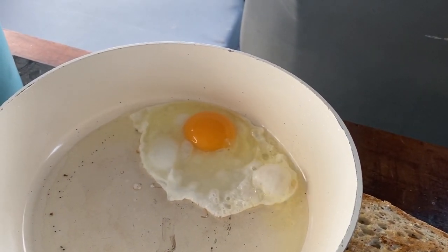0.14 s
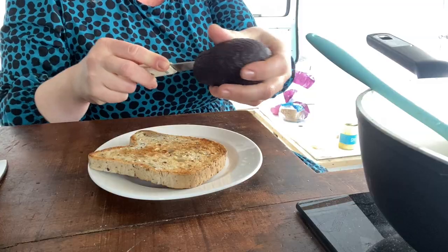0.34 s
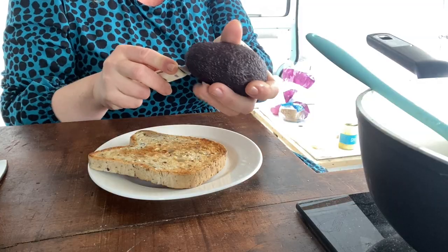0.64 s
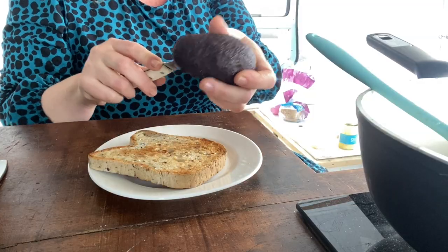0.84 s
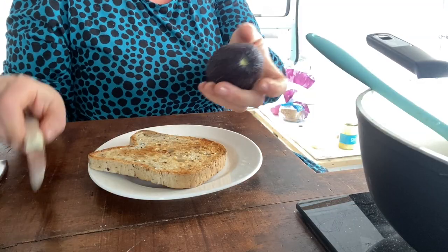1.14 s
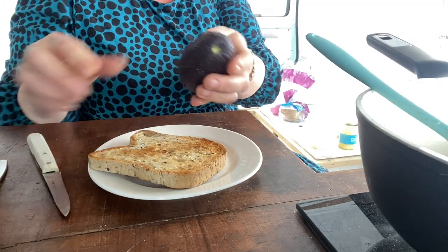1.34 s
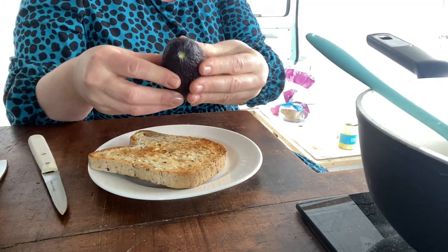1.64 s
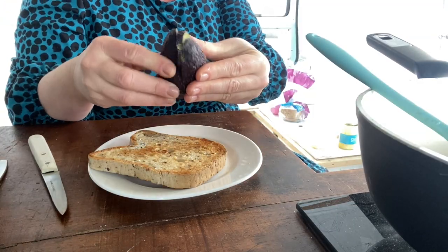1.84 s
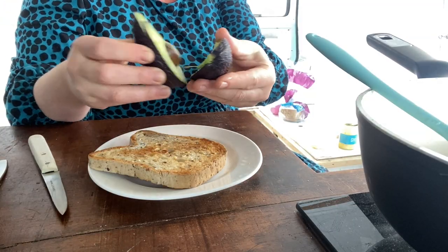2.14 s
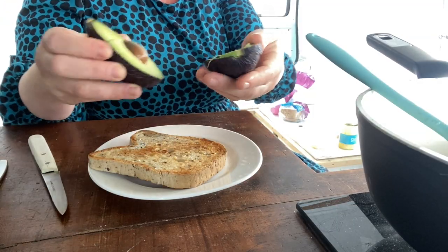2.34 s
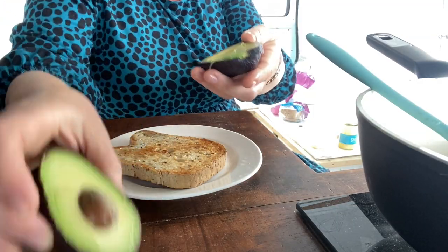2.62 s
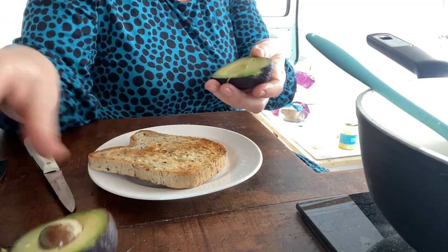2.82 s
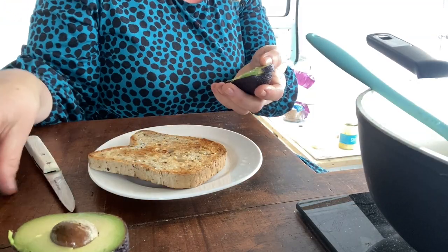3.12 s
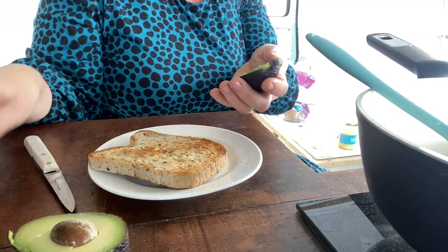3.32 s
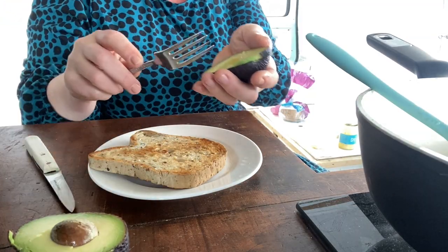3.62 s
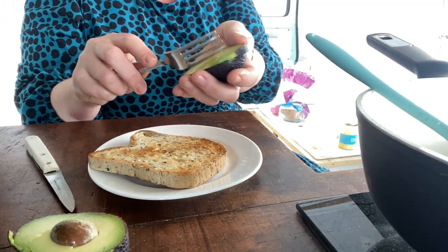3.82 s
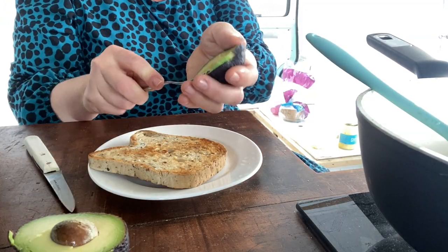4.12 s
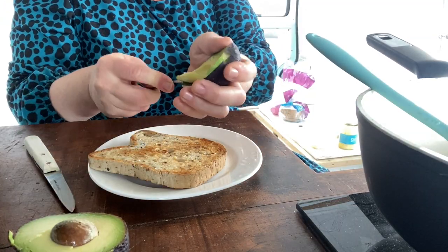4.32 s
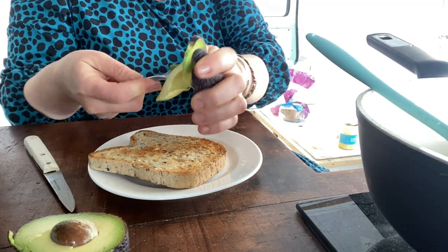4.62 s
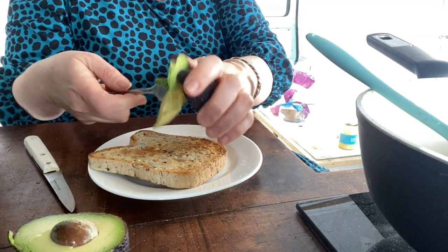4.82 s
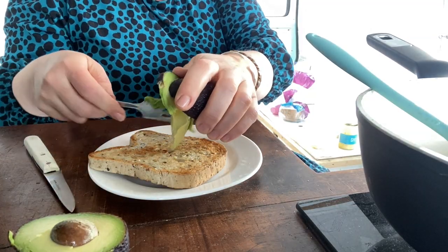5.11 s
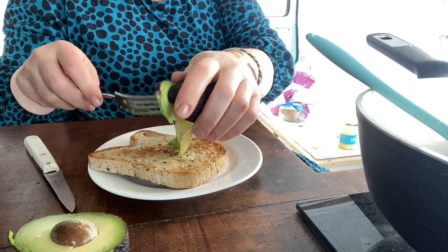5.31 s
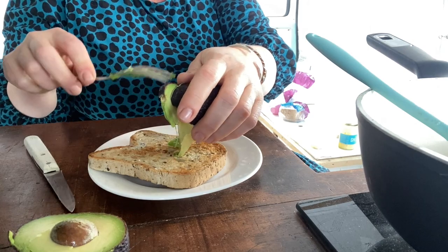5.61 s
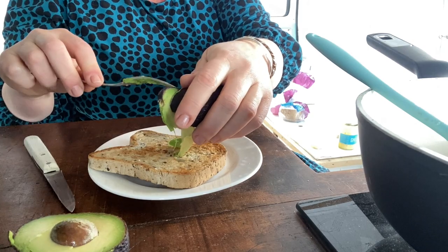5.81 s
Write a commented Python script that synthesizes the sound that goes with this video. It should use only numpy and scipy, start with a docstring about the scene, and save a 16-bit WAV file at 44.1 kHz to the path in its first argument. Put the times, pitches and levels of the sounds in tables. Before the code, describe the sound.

A split second of dry, bright egg-frying crackle right at the microphone cuts abruptly to a table in a small, dry van cabin. Fat keeps spitting irregularly from a pan across the space. A knife snaps out of an avocado, clicks, and rocks to rest on wood. Later come a soft fruit thud, small fork clicks and faint moist scooping, over a low murmur.

```python
"""An egg crackles in hot fat right under the microphone; then the pan spits from across a small van kitchen.
At the table a knife snaps free of an avocado and is laid down, rocking on the wood.
One half of the fruit is set down with a thud, and a fork is picked up and scoops out the other.
Fat, steam and cutlery are coloured bursts and grains of noise; blade and table top are damped modes.
Thuds and knocks add bending waves in the board, and the cabin murmurs in the background."""
import sys
import numpy as np
from scipy import signal
from scipy.fft import rfft, irfft
from scipy.io import wavfile
from scipy.ndimage import uniform_filter1d

SR = 44100
rng = np.random.default_rng(int(sys.argv[2]) if len(sys.argv) > 2 else 0)


def wrap_up_sound(samples):
    """Save the sound to the file named by the first command line argument, as 16-bit audio."""
    columns = np.atleast_2d(samples).T
    # keep every value between -1 and 1, then stretch to whole-number steps
    tamed = np.clip(columns, -1, 1)
    steps = np.round(tamed * 32767).astype(np.int16)
    wavfile.write(sys.argv[1], SR, steps)


N = 262836

MOVE_S = .277  # the microphone changes from the pan to the table
ROOM_T60_S = 0.16
TIME = np.arange(N) / SR
AGE = TIME[:16384]  # seconds since the start of one event
HZ = np.fft.rfftfreq(4096, 1 / SR) + 1  # frequency axis of the spectra; the offset avoids log(0)

# Largest bubbles bursting close to the microphone: start_s, level_db
CLOSE_POPS = [(.0212, -30), (0.0825, -36), (0.0905, -19), (0.1093, -32), (.1272, -36), (0.1768, -36),
              (.181, -40), (0.1907, -32.5), (0.199, -42), (.2212, -28.5), (0.2629, -28.5)]
# Steam blipping from under the egg: start_s, level_db, pitch_hz
STEAM_BLIPS = [(.008, -48, 1600), (.0462, -40, 1400), (.0595, -48, 2100), (.0905, -38, 750),
               (.12, -37, 1100), (.1622, -46, 1500), (.1968, -37, 1200), (.2028, -44, 1500),
               (.2205, -36, 1050), (.2265, -45, 1200), (.2626, -35, 2900)]
# Relative spectrum of the near crackle: frequency_hz, density_db (per Hz)
CLOSE_COLOUR = [(20, -50), (70, -2), (200, -13.5), (400, -5), (800, -9.5), (1400, -4), (3000, -7),
                (5500, -8.5), (8000, -15), (10300, 1), (11500, -6), (12800, -23), (16000, -16)]
# Relative spectrum of a near bubble: frequency_hz, density_db (per Hz)
CLOSE_POP_COLOUR = [(30, -43), (200, -22), (1000, -12.5), (3000, -33), (5500, -6.5), (8000, -4),
                    (10300, 4.5), (11500, -8.5), (12800, -32), (16000, -28)]


def close_pan():
    """Fat right under the microphone: dry, bright crackle of noise grains with short, duller blips of steam."""
    crackles = grains(750, 5, burst(.003, -18, .04))
    tilt = 1.3 * np.log2(HZ / 6000)  # dB
    out = amp(-53.5) * colour(crackles, read(CLOSE_COLOUR) + tilt)
    out += amp(-56.5) * colour(rng.standard_normal((2, N)), read(CLOSE_COLOUR))  # steady hiss
    for start_s, level_db in CLOSE_POPS:
        snap = 1.4 * (AGE == 0)
        pop = snap + burst(snap_t60=.004, room_db=-22, room_t60=.04, crest_db=3)
        add(out, start_s, amp(level_db) * colour(pop, read(CLOSE_POP_COLOUR)))
    for start_s, level_db, pitch_hz in STEAM_BLIPS:
        add(out, start_s, amp(level_db) * blip(pitch_hz, t60=.011, half_width_octaves=.8))
    for when, size, pitch in rng.random(size=(20, 3)):  # many smaller bubbles
        bubble = blip(700 * 3 ** pitch, t60=.01, half_width_octaves=.8)
        add(out, when * MOVE_S, amp(-58 + 8 * size) * bubble)
    # So near, both ports hear much the same.
    out[1] = .7 * out[0] + .6 * out[1]
    return out * np.clip((MOVE_S - TIME) / 0.0023, 0, 1)


# Big drops of fat spitting across the room: start_s, level_db, brightness_db_per_octave
SPITS = [(0.364, -38.5, 0.5), (.453, -38.5, 7.5), (.54, -30.5, 1), (0.603, -35.5, 0.5), (.651, -38, 4),
         (0.7216, -31.5, -0.5), (0.929, -31.5, 1), (1.003, -35.5, -3), (1.055, -36, -0.5),
         (1.1343, -34.5, 0), (1.177, -36, 1), (1.2499, -27, -3.5), (1.403, -34, -2), (1.6304, -37.5, 2),
         (1.817, -35.5, 6), (1.862, -39.5, 13), (1.977, -31, -1.5), (2.0627, -15, 1), (2.1265, -31, -3.5),
         (2.146, -22, 4), (2.348, -42.5, 12), (2.4437, -36.5, 1), (2.5086, -32, 6), (2.6, -39.5, 1.5),
         (2.6049, -29, -2.5), (2.7688, -39.5, 3), (2.7801, -37.5, -1), (2.796, -24.5, 1), (2.8662, -37, 1),
         (2.918, -36, -0.5), (3.036, -29, 2), (3.06, -23.5, 0), (3.176, -40.5, 0), (3.198, -25.5, -0.5),
         (3.219, -21, 1), (3.3662, -19, 2), (3.603, -42, 0), (3.769, -35, -0.5), (3.844, -43, 1),
         (3.904, -36, 1.5), (3.973, -45, 4), (4.053, -42.5, 3), (4.094, -35.5, 14), (4.116, -38, -4.5),
         (4.176, -31, 1), (4.256, -35.5, 2.5), (4.4238, -33, 2), (4.484, -40, 4), (4.701, -38, 8),
         (4.7402, -36.5, 3), (4.851, -40.5, 9.5), (4.955, -18.5, 0), (5.1254, -36.5, 2), (5.2952, -28, 1),
         (5.3012, -25.5, -2.5), (5.472, -39.5, 2), (5.5012, -25, 0.5), (5.5378, -29, -0.5),
         (5.709, -50, -2.5), (5.8003, -37, 3)]
# Longer sputters of escaping steam: centre_s, spread_s (one side), level_db
SPUTTERS = [(3.278, 0.013, -55), (4.173, 0.028, -47.5), (4.191, 0.011, -47), (4.429, 0.021, -47.5)]
# Relative spectrum of spits and sputters: frequency_hz, density_db (per Hz)
SPIT_COLOUR = [(20, -61), (100, -35.5), (300, -21), (450, -29), (640, -39.5), (1000, -15), (1800, -15),
               (2500, -6.5), (3400, -3.5), (5500, -4.5), (8300, 0.5), (10500, -4), (13500, -9),
               (15500, -32)]
# Small drops spit at random between the big ones, level and brightness varying about these centres.
DROPS_PER_S, DROP_DB, DROP_SPREAD_DB, DROP_BRIGHT_DB_PER_OCTAVE = 6.1, -51, 7, 1.5


def far_pan():
    """The pan across the van: noise bursts and grains of spitting fat, coloured and smeared by the walls."""
    walls = cabin()
    steam = sum(amp(level_db) * np.exp(-((TIME - centre_s) / spread_s) ** 2 / 2)
                for centre_s, spread_s, level_db in SPUTTERS)
    froth = grains(740, 8.5, burst(0.002, -12, 0.07))
    out = fizz() + colour(froth * steam, read(SPIT_COLOUR) + walls)
    drops = [(start_s, DROP_DB + DROP_SPREAD_DB * size, DROP_BRIGHT_DB_PER_OCTAVE * (1 + tone))
             for start_s, size, tone in scatter(MOVE_S, N / SR, DROPS_PER_S)]
    for start_s, level_db, bright in SPITS + drops:
        # No two drops burst alike.
        pop = burst(snap_t60=0.032, room_db=-7.5, room_t60=ROOM_T60_S, crest_db=6.0) * splutter()
        own = bright * np.log2(HZ / 6000) + 2.0 * ripple(count=70) + 1.8 * ripple(count=8)
        add(out, start_s, amp(level_db) * colour(pop, read(SPIT_COLOUR) + walls + own))
    return ports(out)


def splutter(depth_db=2.0, samples=90):
    """A drop breaks into droplets: the spray builds for a moment, then flickers within milliseconds."""
    flicker = np.clip(unit(uniform_filter1d(rng.standard_normal(len(AGE)), samples)), -2, 2)
    build = 1 - .5 * fade(.02)
    return amp(depth_db * (flicker - .5) * (1 - fade(.04))) * build


# Relative spectrum of the sizzling bed: frequency_hz, density_db (per Hz)
FIZZ_COLOUR = [(100, -39), (400, -41), (650, -36), (1000, -12.5), (1900, -8.5), (2400, -4.5), (3300, -5.5),
               (4700, -6), (6500, -3.5), (8300, -1.5), (10500, -3.5), (13800, -9.5), (15500, -36)]
# How hard the far pan sizzles: time_s, level_db
HEAT = [(0.28, -57.5), (0.49, -59.5), (1.17, -53.5), (1.31, -52), (1.45, -56), (1.67, -61), (2.02, -54.5),
        (2.21, -63), (2.44, -62.5), (2.84, -66), (2.98, -58), (3.26, -61), (3.42, -60.5), (3.69, -61),
        (4.11, -60), (4.82, -63.5), (5.08, -66), (5.96, -61)]


def fizz(count=6):
    """Tiny crackles from several spots of the pan, each spot with its own colour, over a faint hiss."""
    tone = read(FIZZ_COLOUR) + cabin()
    out = amp(-9) * colour(rng.standard_normal((2, N)), tone)
    for spot in range(count):
        crackles = grains(12, 3.5, burst(.014, -9, .16))
        own = 2.5 * ripple(count=40) + 2.5 * ripple(count=4)
        out += colour(crackles, tone + own) / np.sqrt(count)
    return out * amp(np.interp(TIME, *np.transpose(HEAT)))


# The blade wrenching free: start_s, level_db, hardness_hz
SNAPS = [(.679, -37, 1700), (.683, -26.5, 1370), (.6872, -33.5, 1420), (.694, -35, 3260), (.699, -35, 5140)]
# Modes of blade and fruit: pitch_hz, level_db, t60_s
BLADE_MODES = [(84, -3.5, .07), (125, -11, .07), (371, -13, .1), (765, -15, .09), (900, -5.5, .11),
               (1176, -6, .07), (1270, -1.5, .09), (1370, 5, .025), (1455, 3.5, .055), (1528, -3, .06),
               (1612, -5, .08), (1755, -2, .06), (1979, -6.5, .08), (2277, -2, .035), (2550, -11, .14),
               (2828, 3, .06), (3090, -2, .07), (3300, -4, .06), (3690, -7, .1)]
# Relative spectrum of a crack, for snaps and knocks: frequency_hz, density_db (per Hz)
CRACK_COLOUR = [(20, -66), (100, -12), (200, -10.5), (380, 2), (640, -20), (950, -2.5), (1900, -6.5),
                (3500, 1.5), (4500, 1), (9000, 3.5), (15000, -14)]


def blade():
    """The knife slips out of the fruit in a quick run of snaps, each stirring the damped modes differently."""
    out = np.zeros((2, N))
    for start_s, level_db, hardness_hz in SNAPS:
        crack_db = read(CRACK_COLOUR) + 20 * np.log10(soften(HZ, hardness_hz))
        crack = colour(burst(.02, -6, .07), crack_db)
        tone = ring(BLADE_MODES, hardness_hz, rise_cycles=.8, room_db=-16)
        add(out, start_s, amp(level_db) * (tone + amp(-8) * crack))
    return panned(ports(out), -2.9)


# The knife rocking to rest on the table: start_s, level_db, hardness_hz, flexing_db
KNOCKS = [(1.252, -42, 1000, -47), (1.2756, -27, 2900, -30), (1.308, -28, 800, -28),
          (1.339, -30.5, 786, -36), (1.3457, -36.5, 3240, -48), (1.379, -34.5, 840, -33.5),
          (1.4287, -38, 1280, -37.5), (1.501, -39.5, 1100, -42.5), (1.508, -43, 900, -40),
          (1.529, -47, 714, -48), (1.563, -62, 900, -52), (1.618, -50, 400, -51)]
# Modes of the table top with the knife on it: pitch_hz, level_db, t60_s
TABLE_MODES = [(95.6, -19, 0.19), (160.3, -17, 0.17), (273.8, -16, 0.42), (298, -18, 0.26),
               (331, -20, 0.14), (514, -8.5, 0.06), (772, -12, .07), (831, -7.5, 0.095), (934, 3.5, 0.034),
               (1110, 3, 0.032), (1276, -8.5, 0.11), (1454, -16.5, 0.2), (1870, 7, 0.018),
               (2200, -10.5, 0.1), (2640, 0, 0.032)]
# Soft bumps that reach the table; the run from 3.26 to 3.293 s is the steady buzz of the fork sliding, and the
# rows at 5.301 and 5.501 s give low-mid body to the spits there: start_s, level_db, pitch_hz
THUDS = [(1.311, -40, 170), (2.736, -47, 397), (2.738, -37.5, 150), (2.762, -48, 230), (2.78, -48, 230),
         (2.846, -47.5, 215), (3.086, -43, 400), (3.168, -35.5, 270), (3.177, -46, 280), (3.234, -48, 300),
         (3.26, -48, 275), (3.271, -49, 275), (3.282, -49, 275), (3.293, -48, 275), (5.301, -48, 400),
         (5.501, -54, 430)]
KNOCK_HZ = 293.7  # the pitch that the board's flexing settles to under the knife
THUD_RING_DB = -0.5  # a thud also sets the table top ringing
SWAY_HZ, SWAY_DB, SWAY_T60_S, SWAY_BELOW_HZ = 92, 1.5, 0.45, 134  # deep thuds rock the whole table most


def table():
    """The knife rocks on the wood; fruit, hand and fork bump it: damped modes, noise and bending waves."""
    rattle, body = np.zeros((2, 2, N))
    for start_s, level_db, hardness_hz, flexing_db in KNOCKS:
        crack_db = read(CRACK_COLOUR) + 20 * np.log10(soften(HZ, hardness_hz))
        crack = colour(burst(.016, -19, .11), crack_db)
        tone = ring(TABLE_MODES, hardness_hz, rise_cycles=1.22, room_db=-25)
        add(rattle, start_s, amp(level_db) * (tone + amp(-1) * crack))
        add(body, start_s, amp(flexing_db) * flex(KNOCK_HZ, peak_cycles=1.66, glide_turns=0.26))
    for start_s, level_db, pitch_hz in THUDS:
        boom = colour(burst(.05, -8, .25), band(pitch_hz, .55))
        tone = ring(TABLE_MODES, 0.9 * pitch_hz, rise_cycles=1.9, room_db=-12)
        add(rattle, start_s, amp(level_db) * (amp(-10.5) * boom + amp(THUD_RING_DB) * tone))
        sway = np.sin(2 * np.pi * SWAY_HZ * AGE) * (fade(SWAY_T60_S) - fade(6 / SWAY_HZ))
        sway *= soften(pitch_hz, SWAY_BELOW_HZ) ** 2
        bend = flex(pitch_hz, peak_cycles=1.1, glide_turns=0.25)
        add(body, start_s, amp(level_db) * (bend + amp(SWAY_DB) * sway))
    out = panned(ports(rattle), 1.0) + panned(body, 4.5)
    return signal.sosfilt(signal.butter(2, 50, "highpass", fs=SR, output="sos"), out)


def flex(hz, peak_cycles, glide_turns):
    """A bending wave in the board: it swells and dies within a few cycles, its high part arriving first."""
    u = AGE * hz / peak_cycles
    turns = hz * AGE + glide_turns * (1 - np.exp(-u))
    swell = (u * np.exp(1 - u)) ** 3
    return np.sin(2 * np.pi * turns) * swell * np.ones((2, 1))


# Knife and fork clicking in skin and flesh: start_s, level_db, hardness_hz
CLICKS = [(0.7643, -30, 4430), (.863, -30.5, 3100), (0.87, -33, 3100), (0.887, -36, 3120),
          (0.919, -32.5, 2970), (0.9548, -26.5, 2480), (0.9814, -24.5, 3000), (1.005, -48, 3400),
          (1.063, -30, 3150), (1.086, -35.5, 3100), (1.114, -45, 3400), (1.128, -37.5, 3300),
          (1.198, -23, 3230), (1.2406, -29, 3400), (1.561, -43, 2470), (1.641, -32, 3480),
          (2.141, -26.5, 2920), (2.383, -43.5, 4180), (2.669, -44.5, 2920), (2.884, -40, 2610),
          (3.087, -40, 1400), (3.119, -44, 2950), (3.341, -35.5, 5030), (3.358, -34.5, 2040),
          (3.561, -42.5, 1600), (3.64, -41.5, 4000), (3.677, -39.5, 3600), (3.79, -45, 4500),
          (3.858, -38.5, 2640), (4.142, -31, 4230), (4.172, -35.5, 3020), (4.447, -36, 3440),
          (5.1627, -35.5, 2780), (5.2803, -38, 2390), (5.3006, -28, 3600), (5.419, -40, 1660),
          (5.4803, -38.5, 2030), (5.603, -47, 1590), (5.762, -40.5, 1780), (5.8478, -26, 6160),
          (5.8607, -41, 6640), (5.865, -23.5, 7800), (5.889, -41, 5240)]
# Pockets of air opening in the moist flesh: start_s, level_db, pitch_hz
SQUELCHES = [(5.162, -43.5, 1900), (5.163, -46.5, 6300), (5.2815, -47, 1500), (5.421, -48, 1430),
             (5.483, -48.5, 1090), (5.765, -47.5, 1190)]
# Cutlery scraping softly through the fruit: centre_s, half_length_s, level_db
SCRAPES = [(0.96, 0.27, -62), (3.66, 0.11, -65)]
# Relative spectrum of cutlery in fruit: frequency_hz, density_db (per Hz)
CLICK_COLOUR = [(20, -55), (100, -43), (300, -19.5), (450, -20), (640, -35), (950, -19), (1300, 0.5),
                (1700, -8), (2400, -1), (3300, 2), (4500, 4), (15000, -0.5)]
SCRAPE_HARDNESS_HZ = 3600


def cutlery():
    """Knife and fork in the fruit: dull noise clicks, moist squelches and a soft scrape of fine grains."""
    out = np.zeros((2, N))
    tone = read(CLICK_COLOUR) + cabin()
    for start_s, level_db, hardness_hz in CLICKS:
        dulling = np.maximum(60 * np.log10(soften(HZ, 1.1 * hardness_hz)), -32)  # dB
        own = dulling + 2.0 * ripple(count=12)
        click = burst(snap_t60=0.038, room_db=-16.5, room_t60=0.3, crest_db=10.0)
        add(out, start_s, amp(level_db) * colour(click, tone + own))
    for start_s, level_db, pitch_hz in SQUELCHES:
        add(out, start_s, amp(level_db) * blip(pitch_hz, t60=0.032, half_width_octaves=.45))
    pressure = sum(amp(level_db) * np.exp(-((TIME - centre_s) / half_s) ** 4)
                   for centre_s, half_s, level_db in SCRAPES)
    scrape = grains(170, 2.5, burst(.015, -9, .12)) * pressure
    out += colour(scrape, tone + 60 * np.log10(soften(HZ, SCRAPE_HARDNESS_HZ)))
    return panned(ports(out), -2.1)


# Relative spectrum of the cabin's murmur: frequency_hz, density_db (per Hz)
ROOM_COLOUR = [(12, -42), (28, -19), (48, -4), (70, -4.5), (105, 2.5), (160, -4.5), (230, -15), (330, -5.5),
               (440, -0.5), (640, -21), (950, -16), (1400, -13.5), (2500, -36), (8000, -50)]
# Relative spectrum of the rumble: frequency_hz, density_db (per Hz)
RUMBLE_COLOUR = [(20, -44), (42, 4.5), (70, 1), (105, 9), (170, -3.5), (300, -14), (600, -46), (2000, -37)]
# Swells of low rumble: centre_s, spread_s (one side), level_db
SWELLS = [(4.62, .4, -66.5), (4.2, .04, -64), (4.39, .03, -58), (4.57, .06, -63.5), (5.33, .06, -71)]


def room_tone():
    """The low murmur of the cabin, steady noise, with a lumpy noise rumble that comes in swells."""
    still, moving = rng.standard_normal((2, 2, N))
    swell = sum(amp(level_db) * np.exp(-((TIME - centre_s) / spread_s) ** 2 / 2)
                for centre_s, spread_s, level_db in SWELLS)
    drift = uniform_filter1d(uniform_filter1d(rng.standard_normal(N), 1800), 900)
    lumps_db = 2.2 * unit(drift)
    murmur = amp(-67.5) * colour(still, read(ROOM_COLOUR))
    return ports(murmur + swell * amp(lumps_db) * colour(moving, read(RUMBLE_COLOUR)))


# Resonances of the van's cabin: centre_hz, width_hz, height_db
CABIN_MODES = [(469, 315, 21.5), (896, 120, 10), (1492, 37, 6), (1999, 144, 8.5), (2962, 333, 8.5)]


def cabin(count=5):
    """The resonances of the cabin in dB, with chance ripples for its reflections."""
    peaks = sum(db / (1 + (2 * (HZ - hz) / width) ** 2) for hz, width, db in CABIN_MODES)
    return peaks + 1.6 * ripple(count=count)


# Likeness of the two microphone ports: frequency_hz, correlation (no unit)
LIKENESS = [(60, .95), (180, .85), (330, .7), (550, -.25), (1000, .15), (2000, .1), (3200, -.15),
            (6300, .15), (7400, .97), (9600, .95), (11000, .75), (15000, .8)]
# Phase by which the left port leads: frequency_hz, lead_rad
LEAD = [(20, 0), (9400, 0), (12000, 1.6), (15000, 2.8)]


def ports(x):
    """Gives diffuse sound the likeness and phase of two close ports, keeping the level of their sum."""
    hz = np.fft.rfftfreq(N, 1 / SR) + 1
    like = np.clip(read(LIKENESS, hz), -.9, .995)
    lead = read(LEAD, hz)
    left, other = rfft(x)
    right = (like * left + np.sqrt(1 - like ** 2) * other) * np.exp(-1j * lead)
    sum_gain = np.sqrt((1 + like * np.cos(lead)) / 2)
    return irfft(np.array([left, right]) / sum_gain, N)


def panned(x, db):
    """Makes the left side louder than the right by db."""
    return x * amp([[db / 2], [-db / 2]])


def ring(modes, hardness_hz, rise_cycles, room_db):
    """Damped modes, the low ones slower to build up, each leaving a faint wash in the room."""
    out = np.zeros((2, len(AGE)))
    for hz, db, t60 in modes:
        near_mode_db = -10 * np.log10(1 + ((HZ - hz) / (.12 * hz)) ** 4)
        wash = colour(rng.standard_normal(out.shape), near_mode_db) * fade(ROOM_T60_S)
        build = 1 - np.exp(-(AGE * hz / rise_cycles) ** 2)
        tone = swing(hz * AGE) * fade(t60)
        out += amp(db) * soften(hz, hardness_hz) * (tone + amp(room_db) * wash) * build
    return out


def swing(turns):
    """A vibration as each port meets it, the second a quarter turn early or late."""
    return np.sin(2 * np.pi * np.array([turns, turns + rng.choice([-1, 1]) / 4]))


def soften(hz, hardness_hz):
    """A soft contact hardly excites what lies above its hardness."""
    return 1 / np.sqrt(1 + (hz / hardness_hz) ** 4)


def blip(hz, t60, half_width_octaves):
    """A pocket of gas opens: a few ragged cycles around one pitch."""
    rush = colour(burst(t60, -14, 3 * t60), band(hz, half_width_octaves))
    tone = np.sin(2 * np.pi * hz * AGE) * (fade(t60) - fade(.0014))  # soft onset
    return .4 * tone + .55 * rush


def burst(snap_t60, room_db, room_t60, crest_db=0):
    """A sharp snap of noise and the dense reflections that follow it, turned down by crest_db."""
    envelope = np.hypot(fade(snap_t60), amp(room_db) * fade(room_t60))
    return amp(-crest_db) * rng.standard_normal((2, len(AGE))) * envelope


def grains(per_s, spread_db, grain):
    """Random crackle in which every click sounds as one grain, scaled to an rms of one."""
    return unit(signal.fftconvolve(crackle(per_s, spread_db)[None], grain, axes=1)[:, :N])


def crackle(per_s, spread_db):
    """Random clicks, many small and a few large."""
    size_db = spread_db * np.minimum(rng.exponential(1, N), np.pi)
    return (rng.random(N) < per_s / SR) * rng.choice([-1, 1], N) * amp(size_db)


def scatter(start, end, per_s):
    """Loosely spaced chance events: rows of (start_s, size, tone), size and tone between -1 and 1."""
    slip, size, tone = rng.uniform(-1, 1, (round((end - start) * per_s), 3)).T
    return zip(start + (np.arange(len(slip)) + .5 + slip / 2) / per_s, size, tone)


def ripple(count):
    """Chance hills and hollows in a spectrum, count bins wide."""
    return unit(uniform_filter1d(rng.standard_normal(len(HZ)), count))


def band(hz, half_width_octaves):
    """A band around one pitch, in dB, 3 dB down at half_width_octaves to either side."""
    return -10 * np.log10(1 + (np.log2(HZ / hz) / half_width_octaves) ** 6)


def colour(x, db):
    """Causal minimum-phase filter of unit energy whose gains follow a spectrum in dB."""
    log_gain = np.log(amp(np.maximum(db - db.max(), -100)))
    mirrored = np.r_[log_gain, log_gain[-2:0:-1]]
    taps = np.fft.ifft(np.exp(np.conj(signal.hilbert(mirrored)))).real
    return signal.fftconvolve(x, taps[None] / np.linalg.norm(taps), axes=1)[:, :x.shape[1]]


def read(points, hz=HZ):
    """Reads a spectrum along a logarithmic frequency axis."""
    f, value = np.transpose(points)
    return np.interp(np.log(hz), np.log(np.maximum(f, 1)), value)


def fade(t60):
    """A decay of 60 dB in t60 seconds."""
    return np.exp(-np.log(1000) * AGE / max(t60, 1e-4))


def amp(db):
    """Decibels to gain."""
    return 10 ** (np.asarray(db) / 20)


def unit(x):
    """Scales to an rms of one."""
    return x / np.sqrt(np.mean(x ** 2) + 1e-20)


def add(mix, start_s, sound):
    """Mixes a stereo sound in at a given time."""
    part = mix[:, max(round(start_s * SR), 0):][:, :sound.shape[1]]
    part += sound[:, :part.shape[1]]


def scene():
    """First with the microphone at the pan, then at the table."""
    at_table = np.clip((TIME - MOVE_S) / 0.0034 + 1, 0, 1)
    return close_pan() + at_table * (far_pan() + blade() + table() + cutlery() + room_tone())


EDGE_HZ = 16400


def record(dry):
    """The recorder's band limit: a steep low-pass at EDGE_HZ."""
    low_pass = signal.firwin(511, EDGE_HZ, window=("kaiser", 9), fs=SR)
    return signal.oaconvolve(dry, low_pass[None], "same")


dry = scene()
out = record(dry)
wrap_up_sound(out)
```